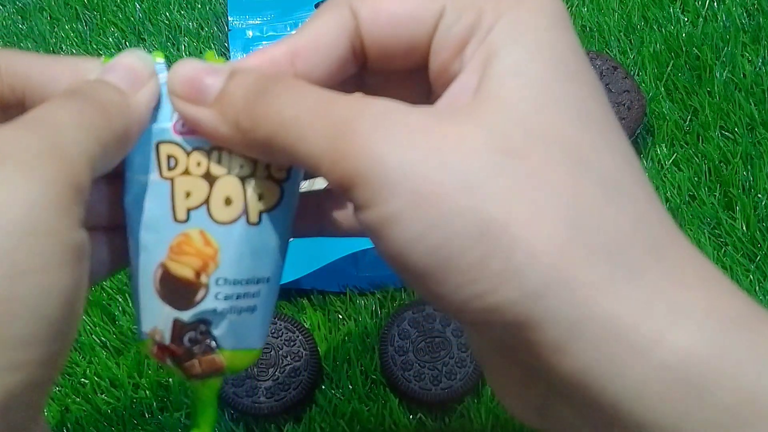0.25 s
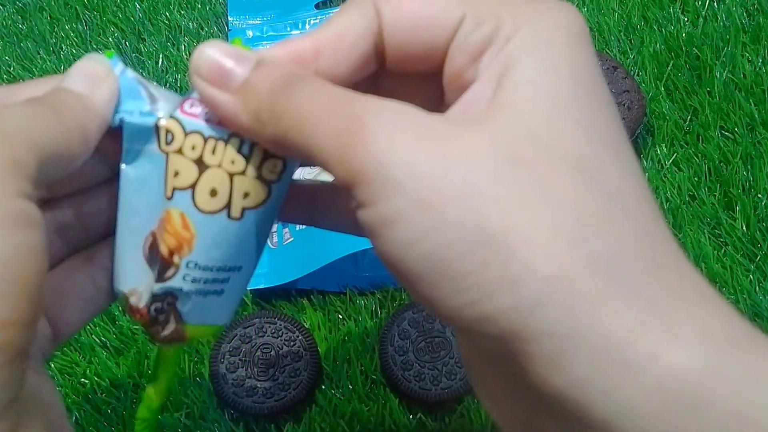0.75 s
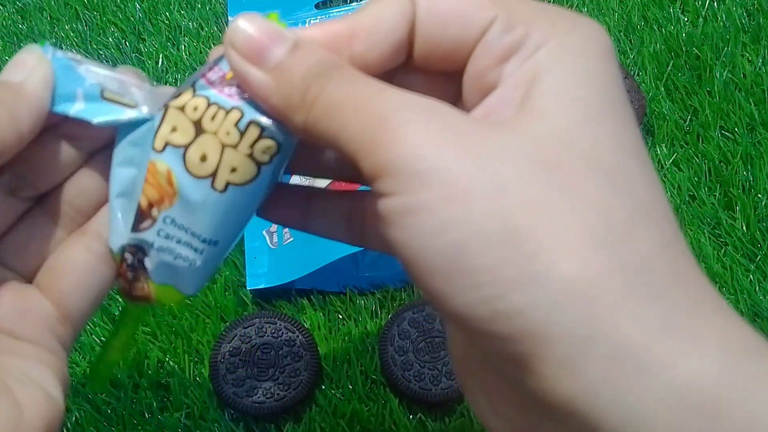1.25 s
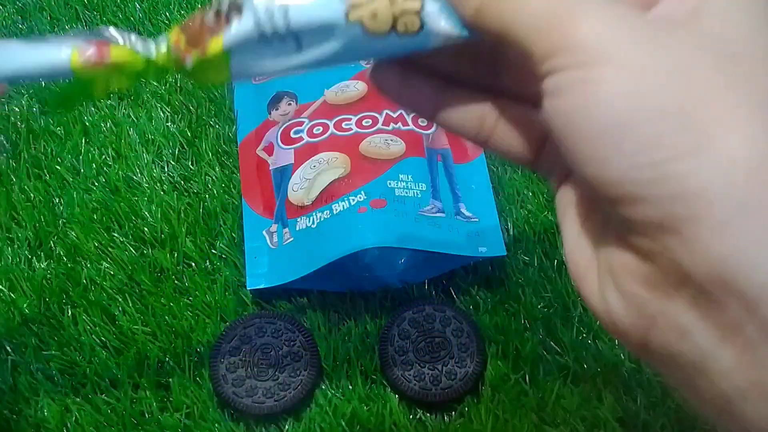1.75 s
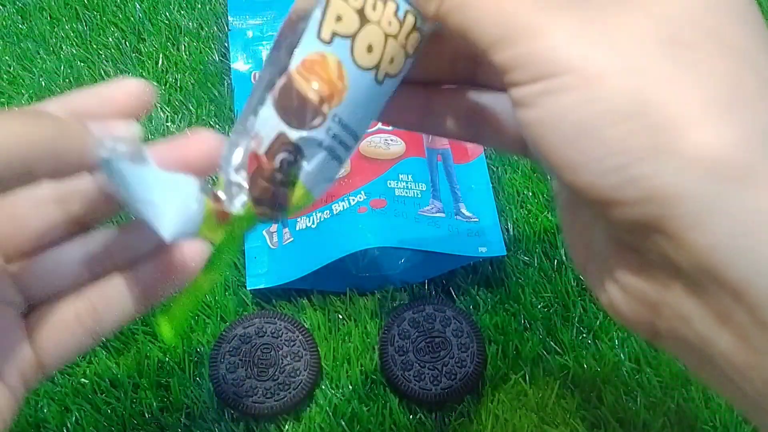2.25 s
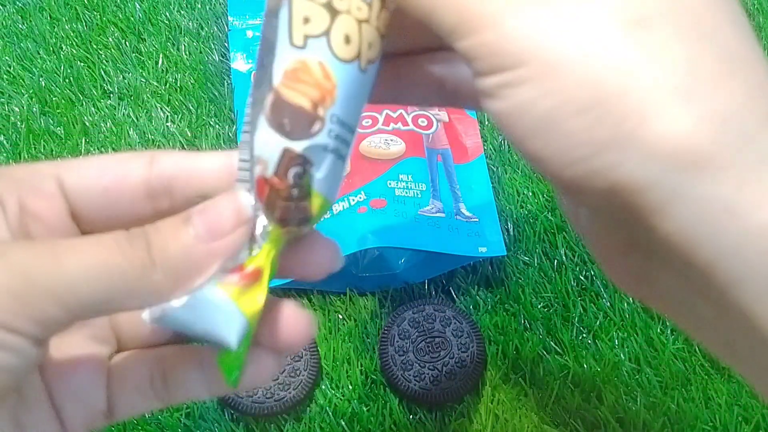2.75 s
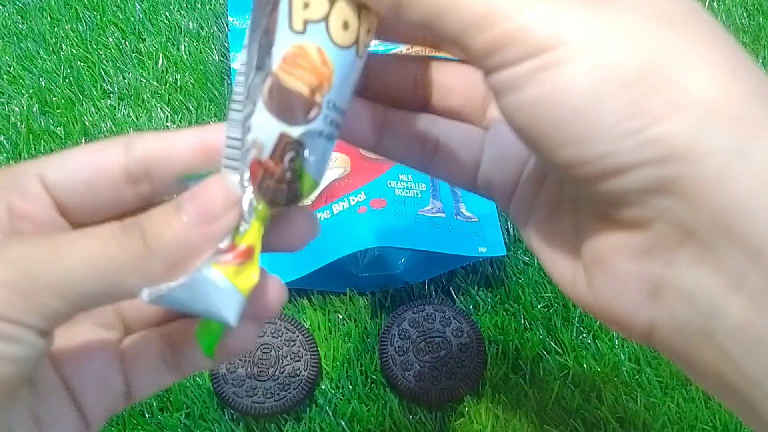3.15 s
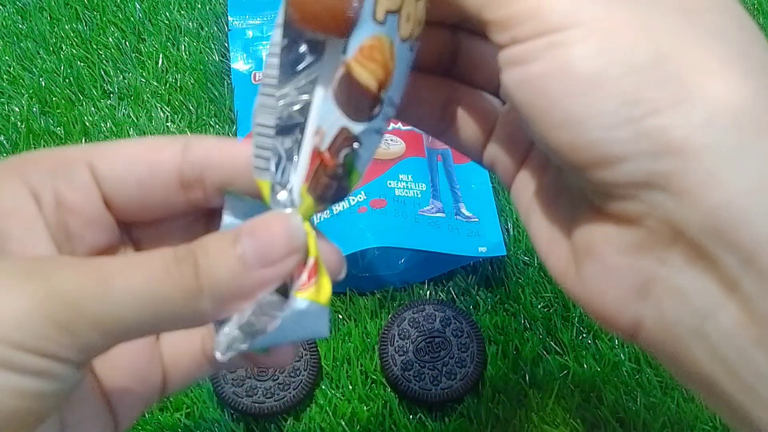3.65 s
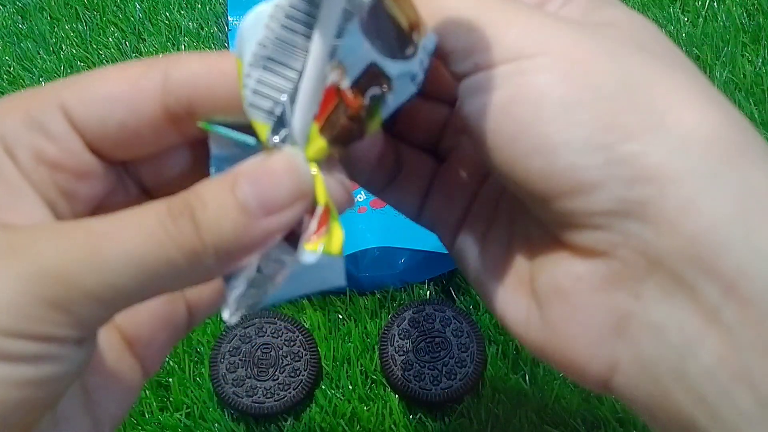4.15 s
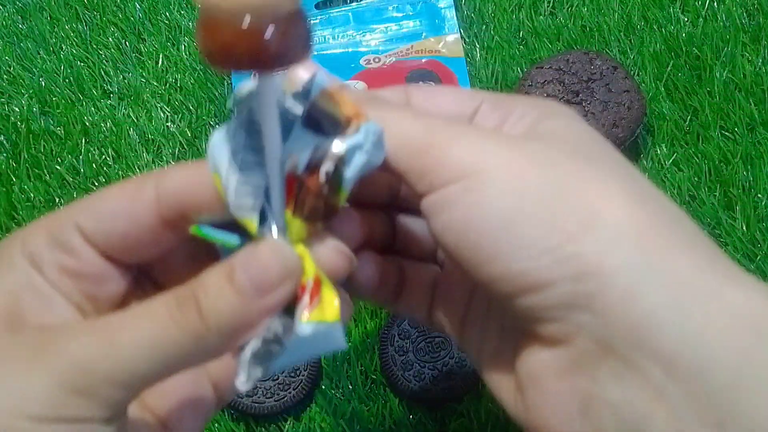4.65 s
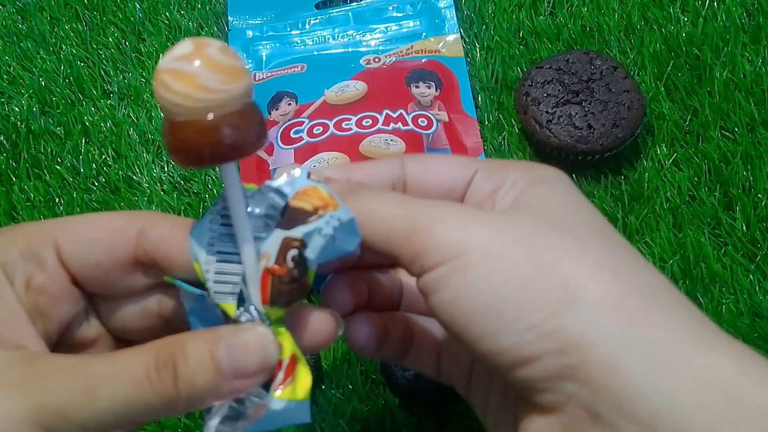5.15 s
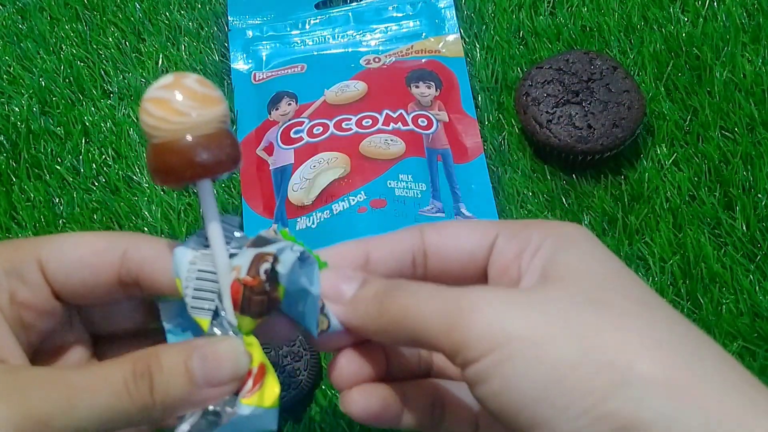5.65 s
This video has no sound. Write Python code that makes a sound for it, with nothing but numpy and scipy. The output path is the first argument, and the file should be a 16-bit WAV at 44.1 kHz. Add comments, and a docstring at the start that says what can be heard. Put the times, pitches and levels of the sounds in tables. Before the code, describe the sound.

A steady low fan hum lies beneath crisp wrapper handling, closely miked with a faint indoor ring. Fine rustling and stiff folds popping build to a sharp seam tear, the loudest moment. The film then eases, crinkles densely again between three and four seconds, slides lightly off the sweet, and ends in sparse crackles.

```python
"""A fan hums steadily in a small room while two hands rustle, tear and peel the plastic wrapper off a lollipop.
The fan is filtered noise with a few wavering tones; the fine rustle is a crowd of tiny random creases.
Stiff folds buckle in single snaps: a ringing panel, a push of air and a bright tick. Small creases tick alone.
At about 1.6 s the seam rips open with a crack, a fast run of fractures; near 4.6 s the film slips in a short run.
The wrapper is close by, with a faint ring of the room behind it."""
import sys
import numpy as np
from scipy import signal
from scipy.fft import rfft, irfft
from scipy.io import wavfile
from scipy.ndimage import uniform_filter1d

SR = 44100
rng = np.random.default_rng(int(sys.argv[2]) if len(sys.argv) > 2 else 0)


def wav_out(sig):
    """Save sig, one row per channel (or a flat mono array), as 16-bit PCM at SR to the path in sys.argv[1]."""
    wavfile.write(sys.argv[1], SR, np.round(np.clip(np.atleast_2d(sig).T, -1, 1) * 32767).astype(np.int16))


N = 260631  # length in samples
TIME = np.arange(N) / SR  # seconds


def from_db(db):
    """Turn decibels into a plain gain."""
    return 10 ** (np.asarray(db) / 20)


def rms_one(x):
    """Scale a sound so that its average strength (rms) is 1."""
    return x / np.sqrt(np.mean(x ** 2) + 1e-20)


def in_time(rows):
    """Gain at every sample, from rows of seconds and dB joined by straight lines."""
    s, db = np.transpose(rows)
    return from_db(np.interp(TIME, s, db))


def at_hz(points, hz, axis=1):
    """Read one column of a table at a pitch, along a logarithmic pitch scale."""
    points = np.array(points)
    return np.interp(np.log(hz), np.log(points[:, 0]), points[:, axis])


def band(x, low_hz, high_hz, order=2):
    """Keep only the pitches between two limits."""
    limits = [low_hz, min(high_hz, SR / 2 - 1000)]
    return signal.sosfilt(signal.butter(order, limits, "band", fs=SR, output="sos"), x + 1e-18)


def noise_bands(size):
    """Noise cut into third-octave bands, as (centre Hz, samples)."""
    edges = np.geomspace(28, 17000, 29)
    return [(np.sqrt(low * high), band(rng.standard_normal(size), low, high))
            for low, high in zip(edges, edges[1:])]


def colour(x, spectrum):
    """Filter a sound to a spectrum, with as little delay as possible (minimum phase)."""
    size = 2048
    hz = np.maximum(np.fft.rfftfreq(size, 1 / SR), 1)
    cepstrum = irfft(np.log(from_db(at_hz(spectrum, hz))))
    # folding the cepstrum forward in time makes the filter answer only after its input
    fold = np.r_[1, np.full(size // 2 - 1, 2), 1, np.zeros(size // 2 - 1)]
    response = irfft(np.exp(rfft(cepstrum * fold)))
    return signal.fftconvolve(x, response)[:len(x)]


def drift(rate):
    """Slow random wandering: chance values of spread 1, this many a second, joined by lines."""
    knots = rng.standard_normal(int(rate * N / SR) + 2)
    return np.interp(TIME * rate, np.arange(len(knots)), knots)


def add(track, s, burst):
    """Lay a burst into a track at time s."""
    at = int(s * SR)
    track[at:at + len(burst)] += burst[:max(len(track) - at, 0)]


def at_level(x, db):
    """Scale a burst so that its energy, spread over 4 ms, has this level."""
    return x * from_db(db) * np.sqrt(.004 * SR / np.sum(x ** 2))


def flutter(length_s, kick=0):
    """A fold jumps over with a kick, then the film shivers for a few milliseconds, evenly at all pitches."""
    t = np.arange(SR // 60) / SR
    fade = np.exp(-(t / length_s) ** 1.5)
    rise = np.minimum(t / .0011, 1)
    shiver = kick * (t == 0) + rng.standard_normal(len(t)) * fade * rise
    # flatten the smoothed spectrum so that no pitch stands out
    power = uniform_filter1d(np.abs(rfft(shiver)) ** 2, 13)
    hz = np.fft.rfftfreq(len(t), 1 / SR) + 1
    return colour(shiver, np.c_[hz, -10 * np.log10(power)])


def crease(length_s=.0025):
    """One small crease flips: a short shiver with a resonance of its own."""
    shiver = flutter(length_s * rng.uniform(.65, 1.35))
    w = 2 * np.pi * rng.uniform(4000, 15000) / SR  # pitch of the resonance, radians per sample
    r = np.exp(-np.pi * 1500 / SR)  # 1500 Hz wide
    ring = signal.lfilter([1 - r * r, 0, r * r - 1], [1, -2 * r * np.cos(w), r * r], shiver)
    return shiver + ring / 2


def crackle(per_s, spread_db, count=120):
    """Creases give way at random, small ones often and large ones seldom; rms 1."""
    shapes = [crease(.0016) for _ in range(count)]
    dealt, signs = rng.integers(0, count, N), rng.choice([-1, 1], N)
    sizes = np.minimum(rng.exponential(1, N), 3)
    out = np.zeros(N)
    for i in np.flatnonzero(rng.random(N) < per_s / SR):
        add(out, TIME[i], signs[i] * shapes[dealt[i]] * from_db(spread_db * sizes[i]))
    # the fingers feed in energy steadily, so large bursts leave less for their neighbours
    power = uniform_filter1d(out ** 2, int(.07 * SR))
    return rms_one(out / np.sqrt(power + .05 * power.mean()))


FAN_DB = -47.5  # level of the fan's air
# Colour of the fan's air. Each row: pitch in Hz, relative level in dB per Hz.
FAN_AIR = [(30, -51), (84, -17.5), (112, 0.5), (230, 2), (330, -6.5), (480, -11.5), (800, -12.5),
           (3000, -32.5), (4300, -45), (15000, -63)]
# Tones of the fan. Each row: pitch in Hz, level in dB, width of the wavering in Hz.
FAN_TONES = [(100.1, -54.5, 0.41), (197, -54.5, 5.2), (978, -68, 3.5)]


def fan():
    """A dull rush of air, as coloured noise, with motor tones that waver in pitch and strength."""
    air = sum(from_db(at_hz(FAN_AIR, hz)) * noise for hz, noise in noise_bands(N))
    out = from_db(FAN_DB) * rms_one(air)
    for hz, db, width in FAN_TONES:
        phase = 2 * np.pi * np.cumsum(hz + width / 2 * drift(9)) / SR
        strength = 1 + .08 * width * drift(5)
        out += from_db(db) * rms_one(np.sin(phase) * strength)
    return out


BUILD_UP_DB, EASE_DB_PER_S = 14.5, 170.5  # a pull swells by this much over its build-up, then dies away
HOLD_DB, HOLD_FLEX_DB = -67.5, -4  # rustle of mere holding; its panel flexing relative to that
# Pulls of the fingers at the film. Each row: moment of greatest strain in seconds, build-up in seconds,
# rustle level in dB, flexing of the large panels in dB relative to the rustle.
PULLS = [(.07, 0.06, -48, -8), (0.42, 0.05, -48, -15), (0.755, 0.08, -41, -10), (0.822, 0.11, -39, -15),
         (1.10, 0.62, -54.5, -3.5), (1.434, 0.059, -39, -14), (1.70, 0.14, -38.5, -8), (1.82, 0.19, -53, 0),
         (2.18, 0.1, -49.5, -7), (2.685, 0.25, -55, -2), (3.193, 0.11, -42, -6.5), (3.61, 0.2, -44.5, -9),
         (3.71, .06, -39, -17), (3.869, 0.2, -41, 1), (4.92, .9, -62, -6), (5.54, 0.1, -48.5, -2),
         (5.897, 0.045, -41, -8)]


def handling():
    """Gains of the creases and of the panels: each pull swells and eases off, over the stir of holding."""
    crease_power = from_db(HOLD_DB) ** 2
    panel_power = from_db(HOLD_DB + HOLD_FLEX_DB) ** 2
    for s, build_s, db, flex_db in PULLS:
        below_db = np.maximum(BUILD_UP_DB * (s - TIME) / build_s, EASE_DB_PER_S * (TIME - s))
        power = from_db(db - below_db) ** 2
        crease_power = crease_power + power
        panel_power = panel_power + power * from_db(flex_db) ** 2
    return np.sqrt(crease_power), np.sqrt(panel_power)


# Colour of the fine rustle. Each row: pitch in Hz, relative level in dB per Hz.
RUSTLE = [(2500, -11.5), (4000, -17), (5500, -5.5), (6700, -6), (8200, 1.5), (9800, -11), (12200, -11.5),
          (15200, 1)]
# Resonances of the stiff panels, for snaps too. Each row: pitch in Hz, relative level in dB per Hz.
PANEL = [(900, -13.5), (1500, -3.5), (2050, 4), (2480, -3.5), (2850, -1), (3650, -2.5), (4300, -12),
         (8000, -18.5)]


def rustle(slide_db, spread_db, flurry_db):
    """Harder handling flips more creases a second, in flurries, and flexes the panels; film slides beneath."""
    effort, flex = handling()
    per_s = np.minimum(260 * (effort / from_db(-50)) ** .65, 420)
    creases = crackle(per_s, spread_db)
    slide = from_db(slide_db) * rng.standard_normal(N)  # film on film
    flurries = from_db(flurry_db * drift(60))
    fine = rms_one((creases + slide) * flurries)
    fine = band(fine, 1100, SR, order=1)  # light film radiates little bass
    return effort * rms_one(colour(fine, RUSTLE)) + flex * rms_one(colour(fine, PANEL))


SLIGHT_PUSH_DB = -49  # push of air where a snap lists none
# Buckling of large folds. Each row: start in seconds, ring of the panel in dB before ring_db is added,
# pitch of the panel in Hz, crease tick in dB before tick_db is added, push of air in dB if more than slight.
SNAPS = [(0.0391, -42, 3450, -30.5), (0.057, -45, 2400, -38), (0.0861, -44, 2700, -35.5),
         (0.255, -46.5, 2300, -56), (0.378, -39, 1400, -36), (0.5871, -29, 2500, -33, -31),
         (0.6733, -31, 2520, -34.5, -26.5), (0.8676, -39, 3000, -36.5), (0.938, -44, 2000, -50),
         (0.9492, -39, 2300, -33), (0.976, -32.5, 1570, -36.5), (1.115, -38, 2400, -43),
         (1.122, -39, 2300, -37), (1.2085, -38.5, 3100, -42, -40), (1.2208, -34.5, 2480, -39),
         (1.3607, -30, 2000, -31.5, -40), (1.5935, -32, 2100, -36.5, -32), (1.6077, -19.5, 2400, -36, -26),
         (1.6127, -19, 2470, -32, -21), (1.6196, -27, 2800, -37, -30), (1.6262, -27, 2400, -34, -27),
         (1.663, -26.5, 1400, -33, -36), (1.677, -29.5, 3300, -31), (1.7926, -37, 2200, -46),
         (1.919, -46, 3000, -51), (2.1599, -31, 2500, -36.5, -41), (2.1635, -35.5, 2100, -34.5, -33.5),
         (2.1837, -37.5, 2300, -36, -39), (2.4636, -24.5, 3020, -39.5), (2.553, -43, 3000, -45.5),
         (2.659, -43.5, 2700, -49), (2.819, -49, 2700, -53), (2.967, -42.5, 3600, -46),
         (3.056, -47.5, 2600, -50), (3.083, -34.5, 2100, -59), (3.1077, -29.5, 2920, -34.5),
         (3.122, -35.5, 2500, -38.5), (3.2013, -38, 2980, -40), (3.257, -38, 2600, -40),
         (3.3657, -33, 2860, -35), (3.3867, -33, 2610, -43), (3.4486, -31.5, 3100, -38),
         (3.458, -26, 2950, -33.5), (3.551, -31, 2900, -30, -29), (3.5595, -32, 2800, -39, -35),
         (3.579, -27.5, 1420, -37), (3.583, -33, 2300, -31.5, -40), (3.601, -35, 2900, -31.5),
         (3.762, -22.5, 1600, -32, -31.5), (3.8312, -35, 1900, -36), (3.849, -33.5, 2400, -38.5, -39.5),
         (3.885, -37, 3400, -39), (3.9042, -36.5, 3700, -34.5), (4.424, -47, 2900, -38.5),
         (4.4437, -39, 3500, -37), (4.964, -42.5, 2660, -45.5), (5.1506, -39, 2460, -40),
         (5.1831, -40, 2760, -36.5), (5.428, -43, 2700, -35.5), (5.8795, -37, 3540, -29.5)]
# Air that a buckling fold pushes aside. Each row: pitch in Hz, relative level in dB per Hz.
PUSH = [(50, -35), (150, -2.5), (480, -2), (780, 4.5), (1450, 1.5), (2300, -15), (6000, -28.5)]
# Colour of crease ticks, for single ticks and slips too. Each row: pitch in Hz, relative level in dB per Hz.
TICK = [(2500, -12), (5000, -5), (6300, -6), (7400, -1), (8100, 0), (8700, -4), (9800, -11), (12000, -11),
        (15200, 0)]


def snaps(ring_db, tick_db, width):
    """Each buckle rings a panel of film, pushes a little air and sends a bright tick along the crease."""
    out = np.zeros(N)
    for s, db, hz, tick, *push in SNAPS:
        kick = 20 * from_db(.6 * db)  # strong folds let go more abruptly
        panel = colour(band(flutter(.0018, kick), hz / width, hz * width, order=1), PANEL)
        air = colour(flutter(.0016, 2 * kick), PUSH)
        # a large fold's tick is duller than a small crease's
        edge = band(colour(flutter(.003), TICK), 2300, 11500)
        add(out, s, at_level(panel, db + ring_db))
        add(out, s, at_level(air, push[0] if push else SLIGHT_PUSH_DB))
        add(out, s, at_level(edge, tick + tick_db))
    return out


# Small creases that flip without ringing a panel. Each row: start in seconds, level in dB before level_db is added.
TICKS = [(0.162, -36), (0.2075, -38.5), (0.465, -36.5), (0.82, -35), (0.827, -34.5), (0.8974, -38.5),
         (1.047, -38), (1.1825, -39.5), (1.3286, -41), (1.356, -41), (1.3976, -38), (1.417, -36),
         (1.425, -36), (1.493, -42), (1.505, -42), (1.727, -31), (1.8698, -37.5), (2.104, -48),
         (2.1675, -33.5), (2.3366, -37), (3.128, -39), (3.1817, -35.5), (3.223, -33.5), (3.242, -40),
         (3.338, -44), (3.3518, -37), (3.405, -33), (3.428, -35.5), (3.694, -36), (3.941, -40),
         (4.335, -37.5), (4.455, -41), (4.5126, -45), (4.563, -49), (4.596, -48), (4.678, -42),
         (4.793, -50), (5.01, -45.5), (5.125, -50), (5.545, -40), (5.6125, -39), (5.682, -36), (5.813, -47),
         (5.8355, -43), (5.8603, -41)]


def ticks(level_db):
    """Single bright flips of small creases."""
    out = np.zeros(N)
    for s, db in TICKS:
        add(out, s, at_level(colour(crease(), TICK), db + level_db))
    return out


# Loudness of the ripping seam. Each row: time in seconds, level in dB.
RIP = [(1.58, -43), (1.597, -36), (1.625, -29.5), (1.66, -34), (1.77, -66)]
# Colour of the ripping seam. Each row: pitch in Hz, relative level in dB per Hz.
SEAM = [(50, -31), (330, 1), (850, 3.5), (2100, -0.5), (3100, 4), (4200, -13), (7500, -4.5), (11000, -23)]


def rip():
    """The sealed seam lets go in a fast run of small fractures."""
    fractures = crackle(400, spread_db=4.5)
    ripping = (TIME > RIP[0][0]) * (TIME < RIP[-1][0])
    return in_time(RIP) * rms_one(colour(fractures, SEAM)) * ripping


SLIP_START_S, SLIP_LENGTH_S, SLIPS_PER_S = 4.622, 0.086, 110
SLIP_DB, SLIP_FADE_DB_PER_S = -42, 100  # average level of the first slip, and how fast they weaken


def slips():
    """Sliding off the sweet, the film catches and lets go unevenly, ever more weakly; its taut edge rings."""
    out, t = np.zeros(N), 0
    while t < SLIP_LENGTH_S:
        db = SLIP_DB - SLIP_FADE_DB_PER_S * t + rng.normal(0, 2.4)
        slip = crease()
        taut_edge = band(slip, 3700, 4700) / 2
        add(out, SLIP_START_S + t, at_level(colour(slip, TICK) + taut_edge, db))
        t += rng.uniform(.55, 1.45) / SLIPS_PER_S
    return out


# Ring of the room. Each row: pitch in Hz, strength in dB, time to die away by 60 dB in seconds.
ROOM = [(298, -2.5, 1), (1530, -13, 0.51), (3300, -11.5, 0.89), (4200, -13.5, 0.64), (8200, -9.5, 0.44),
        (11500, -10.5, 0.3), (15000, -6, 0.2)]


def room(x):
    """A faint diffuse tail of fading noise bands, which in the main die sooner in the treble."""
    t = np.arange(SR) / SR
    tail = np.zeros(SR)
    for hz, noise in noise_bands(SR):
        t60 = at_hz(ROOM, hz, axis=2)
        fade = from_db(at_hz(ROOM, hz) - 60 * t / t60)
        # long and short tails of equal strength carry equal energy
        tail += noise * fade * np.sqrt(2 * np.log(1000) / (t60 * SR))
    onset = 1 - np.exp(-t / .0013)
    return signal.fftconvolve(x, tail * onset)[:N]


def scene():
    """The wrapper close by, its faint ring in the room, and the fan."""
    seam = rip()
    wrapper = rustle(slide_db=-14, spread_db=2.8, flurry_db=2)
    wrapper = wrapper + snaps(ring_db=0.57, tick_db=0.5, width=1.197) + ticks(level_db=2.0)
    wrapper = wrapper + seam + slips()
    flap = band(seam, 2700, 3400, order=1)  # the freed flap rings away from the listener, into the room
    return (fan() + wrapper + room(wrapper + flap))[None]


def record(dry):
    """Cut the top steeply above 15550 Hz."""
    return signal.sosfilt(signal.ellip(10, .2, 70, 15550, fs=SR, output="sos"), dry)


dry = scene()
out = record(dry)
wav_out(out)
```